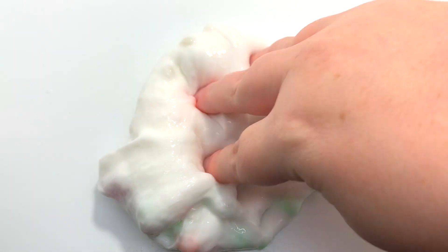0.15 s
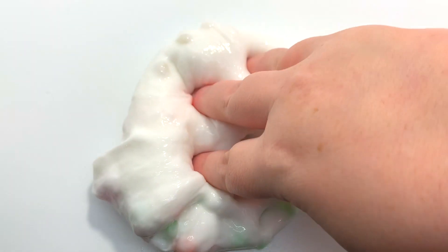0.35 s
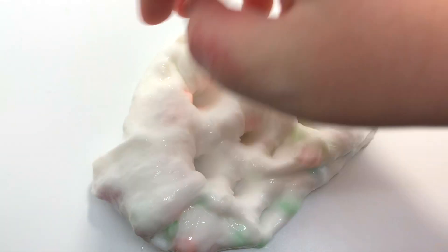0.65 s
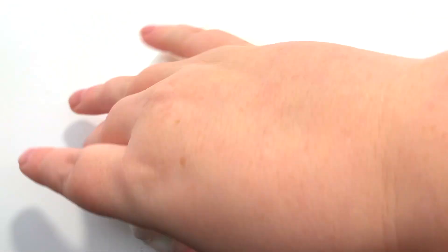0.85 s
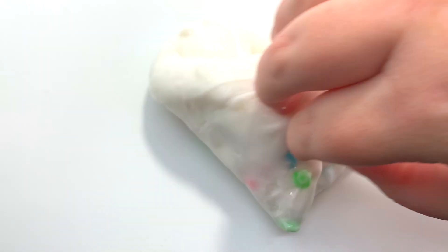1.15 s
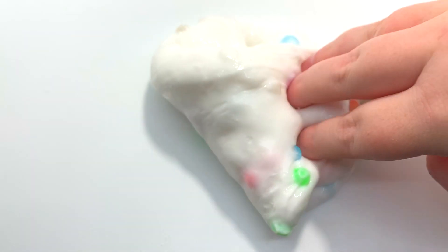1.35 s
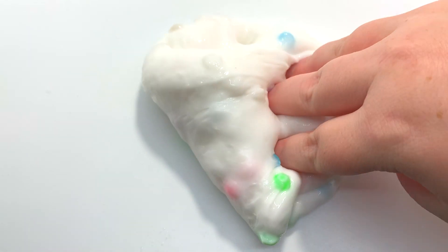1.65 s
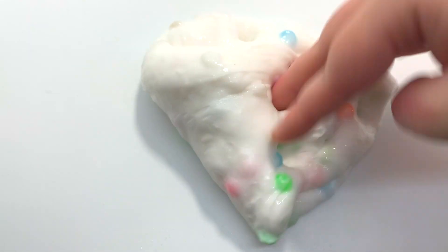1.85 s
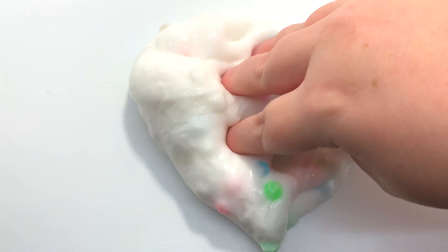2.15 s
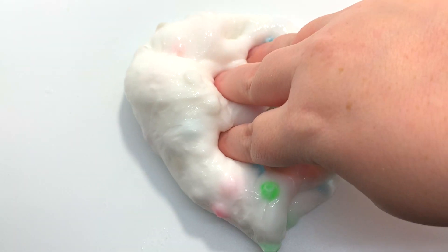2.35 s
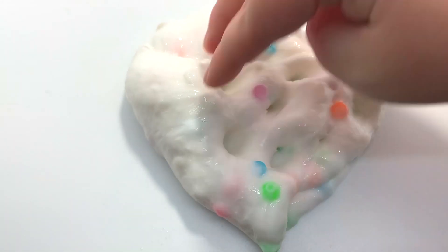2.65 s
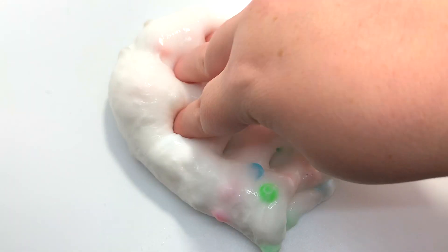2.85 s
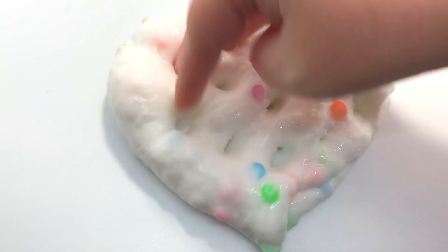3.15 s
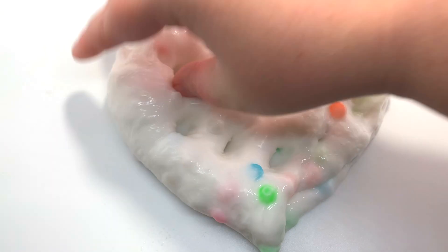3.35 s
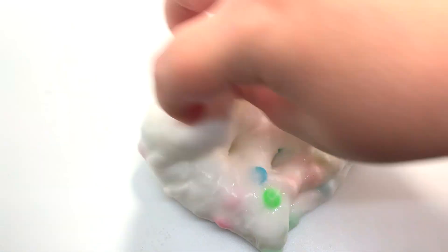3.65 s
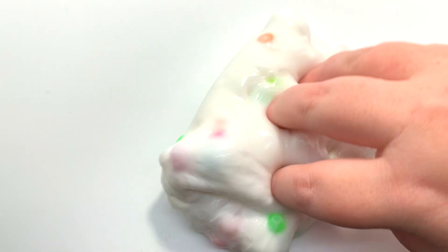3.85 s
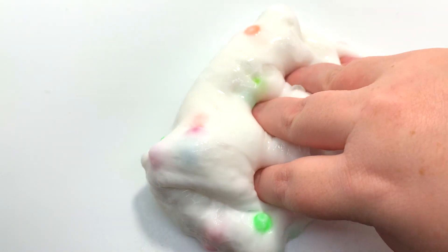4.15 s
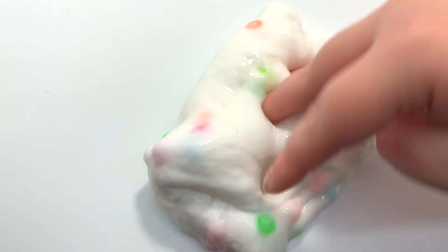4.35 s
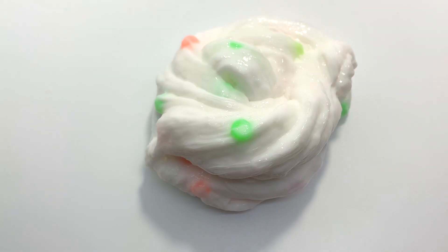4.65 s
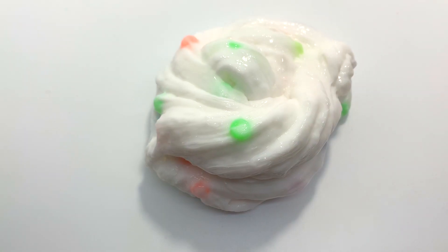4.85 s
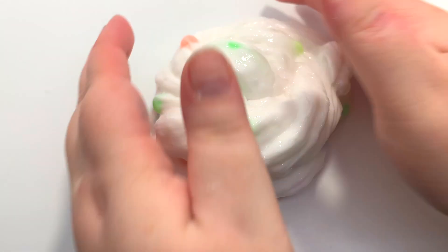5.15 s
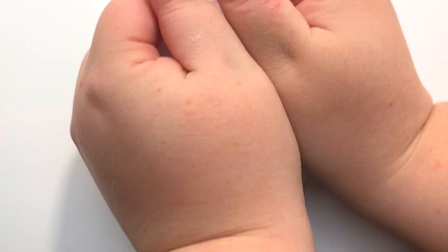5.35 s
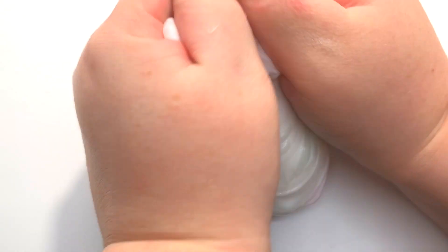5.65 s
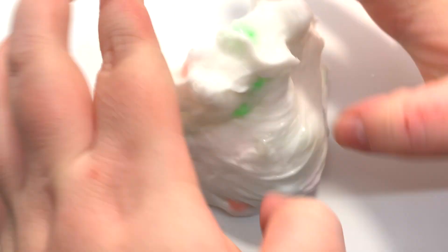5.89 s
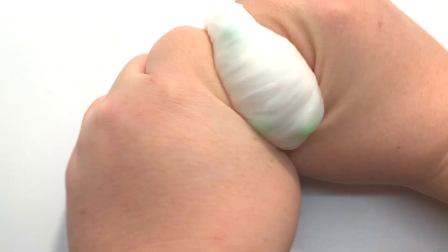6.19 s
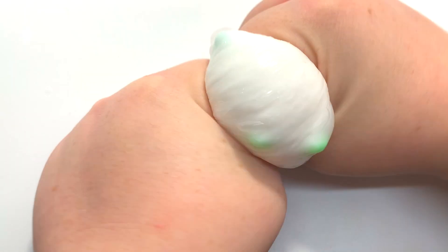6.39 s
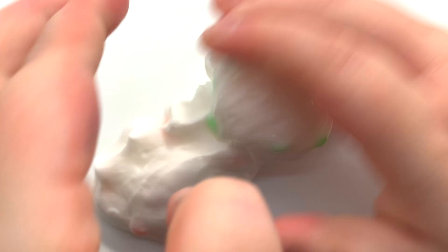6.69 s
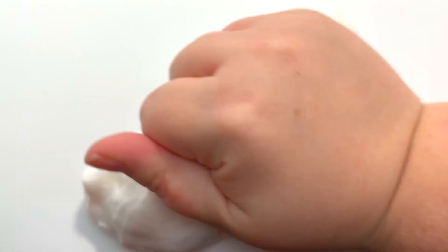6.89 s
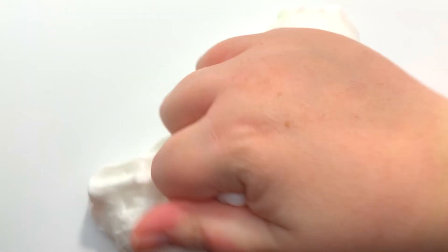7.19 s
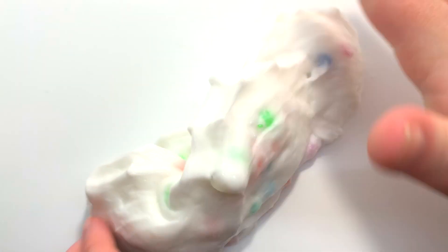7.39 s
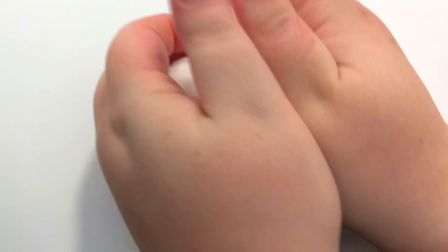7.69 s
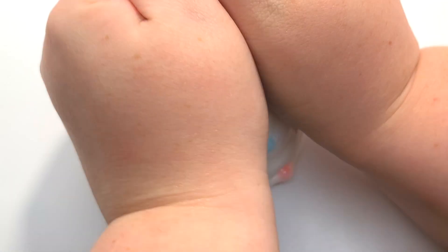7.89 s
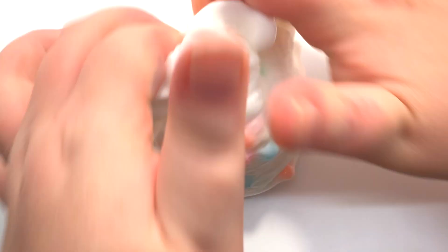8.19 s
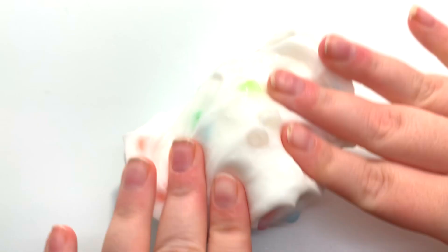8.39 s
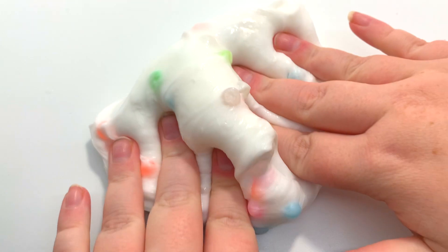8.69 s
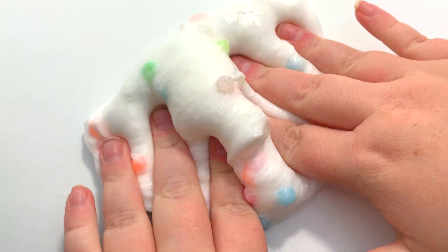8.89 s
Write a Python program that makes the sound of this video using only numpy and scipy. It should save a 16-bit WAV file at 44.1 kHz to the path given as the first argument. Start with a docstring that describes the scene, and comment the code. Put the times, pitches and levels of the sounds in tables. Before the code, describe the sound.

Very close to the microphone in a small quiet room, fingers poke thick slime on a table. Isolated hollow pops and clicks come with soft low bumps, ending in a quick cluster of pops. After a brief abrupt hush with only faint air noise and hum, hands squeeze and fold the slime hard, giving loud dense crackles, sharp snaps and wet squelches, then thinning out to near quiet.

```python
"""Slime kneaded on a table

Thick slime is poked, folded and squeezed on a table close to the microphone, in a small quiet room.
Air pockets burst: a decaying sine with a hollow gurgle, and a bright noise snap with a click.
Hand strokes swell grainy noise into squelch and peeling crackle, and low noise into table shake.
Feedback delays echo the bursts; steady air noise and an unsteady low hum lie behind.
"""
import sys
import numpy as np
from scipy import signal
from scipy.io import wavfile

SR = 44100
rng = np.random.default_rng(int(sys.argv[2]) if len(sys.argv) > 2 else 0)


def store_wav(level_fs):
    """Save 16-bit WAV to argv[1]."""
    pcm = np.round(np.clip(np.atleast_2d(level_fs), -1, 1) * 32767)
    wavfile.write(sys.argv[1], SR, pcm.T.astype(np.int16))


N = 398223


def from_db(db):
    """Amplitude gain of a level in dB."""
    return 10 ** (np.asarray(db) / 20)


def rms_one(x):
    """Scale to rms 1."""
    return x / np.sqrt(np.mean(x ** 2) + 1e-20)


def band(x, low_hz, high_hz):
    """Butterworth band-pass."""
    edges_hz = [low_hz, min(high_hz, .45 * SR)]
    return signal.sosfilt(signal.butter(2, edges_hz, "band", fs=SR, output="sos"), x)


def coloured(sources, spectrum):
    """Third-octave bands dealt from the sources in turn, weighted by the spectrum; rms 1."""
    hz, level_db = np.transpose(spectrum)
    edges = np.geomspace(hz[0], hz[-1], int(3 * np.log2(hz[-1] / hz[0])) + 1)
    log_centres = np.log(edges[1:] * edges[:-1]) / 2
    gains = from_db(np.interp(log_centres, np.log(hz), level_db))
    total = 0
    for k, gain in enumerate(gains):
        total = total + gain * band(sources[k % len(sources)], edges[k], edges[k + 1])
    return rms_one(total)


def room_tone():
    """Steady air noise and an unsteady low hum, the hum being narrow-band noise."""
    # air noise: f/Hz, relative density/dB per Hz
    air_spectrum = [(18, 2), (62, -1), (75, -24.5), (130, -17), (220, -29.5), (500, -38.5), (900, -35.5),
                    (2500, -48), (16500, -58)]
    air = from_db(-54) * coloured(rng.standard_normal((2, N)), air_spectrum)
    hum = from_db(-60) * rms_one(band(rng.standard_normal(N), 56.5, 61.1))
    return air + hum


def strokes():
    """Hand movements: peak s, rise ms, fall ms, hollow Hz, then squelch, crackle, thump, shake in dB."""
    # fingers poke down through the slime: peak/s, squelch/dB, table shake/dB
    poke_table = [(0.481, -50, -33.5), (1.838, -53, -36), (2.478, -52.5, -38), (3.099, -52, -31),
                  (4.365, -48.5, -31.5), (8.949, -43.5, -38)]
    # the hand or the lump bumps the table: peak/s, thump/dB, table shake/dB
    bump_table = [(0.791, -45.5, -40), (1.978, -50.5, -44), (2.662, -45.5, -34), (3.36, -42, -29.5),
                  (5.157, -62, -34), (6.688, -55, -37.5), (7.28, -63, -34.5)]
    # squeezes, folds, peels: peak/s, rise/ms and fall/ms over 20 dB, squelch/dB, crackle/dB, table shake/dB
    squeeze_table = [(0.03, 32.5, 171, -66, -70, -49), (0.862, 51.6, 260, -60.5, -58.5, -53),
                     (3.429, 41.7, 22, -48, -58, -38.5), (3.552, 89, 171, -55, -56.5, -44.5),
                     (3.787, 89, 268, -71.5, -74.5, -64.5), (5.05, 22.3, 160, -68, -65.5, -56),
                     (5.302, 148, 123, -49.5, -40, -48.5), (5.456, 29, 126, -41, -33, -52),
                     (5.699, 61.5, 84, -43.5, -42, -42), (5.798, 40, 75, -49, -57, -41),
                     (5.951, 44, 73.5, -64.5, -63, -45), (6.122, 111.5, 171, -39.5, -36, -45.5),
                     (6.43, 80, 93, -42.5, -42, -40), (6.528, 26.4, 42.5, -57, -54.5, -41.5),
                     (6.862, 136, 160, -48.5, -45, -51.5), (7.181, 78, 78, -46, -47, -40.5),
                     (7.35, 41.4, 43.6, -54.5, -65, -42.5), (7.426, 35.7, 72, -54.5, -57.5, -43),
                     (7.569, 97, 130, -57.5, -53, -60.5), (7.729, 56, 44.5, -57.5, -50, -44.5),
                     (7.88, 131, 144, -50, -44, -63), (8.072, 51.3, 69, -47.5, -43.5, -35.5),
                     (8.22, 134, 54.5, -45, -54, -46.5), (8.4, 282, 453, -75, -71.5, -61)]
    base_hollow_hz, db_per_octave = 1590, 14
    moves = []
    for s, wet_db, shake_db in poke_table:
        moves.append((s, 55, 99, 600, wet_db, wet_db - 7, shake_db - 3.5, shake_db))
    for s, thump_db, shake_db in bump_table:
        moves.append((s, 12.3, 37.4, 660, shake_db - 22, shake_db - 41.5, thump_db, shake_db))
    for s, rise_ms, fall_ms, wet_db, dry_db, shake_db in squeeze_table:
        # the wetter a squeeze (squelch above crackle), the deeper its hollow
        hollow_hz = base_hollow_hz * 2 ** (min(dry_db - wet_db, 0) / db_per_octave)
        moves.append((s, rise_ms, fall_ms, hollow_hz, wet_db, dry_db, shake_db - 12, shake_db))
    return moves


def grains(per_s, spread_db, smooth):
    """Envelope of films tearing at random in uneven short puffs, over a steady part."""
    puff_t60_s = 0.015
    sizes = from_db(spread_db * np.minimum(rng.exponential(1, N), 5))
    tears = sizes * (rng.random(N) < per_s / SR)
    return rms_one(signal.lfilter([1], [1, -from_db(-60 / (puff_t60_s * SR))], tears)) + smooth


def ticks(per_s, level):
    """Stray threads snapping: clicks of very uneven size, each dealt to one broad band."""
    sizes = from_db(5 * np.minimum(rng.exponential(1, N), 3)) * rng.choice([-1, 1], N)
    born = rng.random(N) < per_s / SR
    dealt = rng.integers(0, 8, N)
    snaps = np.zeros(N)
    for k, hz in enumerate(np.geomspace(1200, 9500, 8)):
        clicks = sizes * born * (dealt == k) + 1e-18
        snaps += band(clicks, hz / 1.3, hz * 1.3) / np.sqrt(hz)
    return level * rms_one(snaps)


def kneading():
    """Wet squelch, peeling crackle and the low shaking that the hands send through the table."""
    # squelch: f/Hz, relative density/dB per Hz
    squelch_spectrum = [(330, -10), (700, 0), (1700, -2), (3600, -11.5)]
    # crackle: f/Hz, relative density/dB per Hz
    crackle_spectrum = [(1470, -29), (2500, -6), (7260, -4.5), (15100, -22.5), (16500, -32)]
    t, power, wet = np.arange(N) / SR, np.zeros((3, N)), np.zeros(N)

    # some films tear across the whole range, others only in a few bands, so the colour keeps shifting
    broad = grains(90, spread_db=5.0, smooth=0.93)
    torn = []
    for _ in range(5):
        envelope = broad + grains(110, spread_db=6.5, smooth=.25)
        torn.append(envelope * rng.standard_normal(N))
    slush = coloured(torn[:3], squelch_spectrum)

    for peak_s, rise_ms, fall_ms, hollow_hz, squelch_db, *levels_db in strokes():
        # four rise times before the peak to four fall times after
        start = max(round((peak_s - rise_ms / 250) * SR), 0)
        span = slice(start, round((peak_s + fall_ms / 250) * SR))
        away = 1000 * np.abs(t[span] - peak_s) / np.where(t[span] < peak_s, rise_ms, fall_ms)
        swell = from_db(-20 * away ** 1.8)
        power[:, span] += (from_db(levels_db)[:, None] * swell) ** 2
        # the hollow between hand and slime resonates
        hollow = rms_one(band(slush[span], hollow_hz / 1.22, hollow_hz * 1.22))
        wet[span] += from_db(squelch_db) * swell * (1.023 * slush[span] + 0.32 * hollow)

    crackle, thump, shake = np.sqrt(power)
    peeling = crackle * coloured(torn[2:], crackle_spectrum)

    # threads go on snapping for a while after the hand has let go
    settle = np.exp(-1 / (.12 * SR))
    capped = np.minimum(crackle, from_db(-52.5))
    stray = ticks(48, from_db(-16) * signal.lfilter([1 - settle], [1, -settle], capped))

    gooey = grains(85, spread_db=2.5, smooth=0.8) * rng.standard_normal(N)
    thumping = thump * rms_one(band(gooey, 99, 300))
    shaking = shake * rms_one(band(rng.standard_normal(N), 9.2, 78))
    return wet + peeling + stray + thumping + shaking


def pops():
    """Each pocket rings a few cycles, sinking in pitch as it opens; the torn skin snaps and sprays noise."""
    # bursting air pockets: t/s, pocket f/Hz, pocket level/dB, snap level/dB
    pop_table = [(0.06, 1660, -67, -55), (0.183, 1690, -56, -49), (0.436, 1780, -13, -24),
                 (0.5008, 1120, -31.5, -41), (0.787, 1680, -42, -65), (0.807, 2500, -47, -72),
                 (0.844, 2090, -34, -53), (0.9626, 1460, -31.5, -43.5), (1.035, 1610, -41, -45),
                 (1.3095, 1750, -41.5, -37), (1.778, 1640, -21, -39), (1.7887, 1460, -8.5, -13),
                 (1.8127, 1155, -11, -25.5), (1.8487, 850, -25.5, -32), (2.078, 1500, -59, -51.5),
                 (2.4178, 1600, -12.5, -20), (2.4611, 1200, -3.5, -18.5), (3.062, 1690, -30.5, -51),
                 (3.0733, 1410, -24, -46), (3.088, 1410, -28, -38), (3.1114, 1176, -5.5, -10.5),
                 (3.1465, 600, -30, -26), (3.3531, 685, -33, -40.5), (3.5396, 1170, -29.5, -35),
                 (3.636, 1240, -44, -47), (3.784, 1330, -51, -46), (3.828, 1260, -52, -54.5),
                 (3.878, 1900, -55, -60.5), (4.007, 2170, -58, -73), (4.061, 2250, -55.5, -71),
                 (4.115, 2300, -55.5, -75), (4.2742, 2060, -14.5, -45.5), (4.2848, 1940, -28, -28),
                 (4.3011, 1220, -3.5, -16.5), (4.327, 1160, -7.5, -13), (4.3608, 1170, -9, -14),
                 (4.406, 990, -30.5, -58), (5.2032, 1610, -21.5, -27.5), (5.2642, 1710, -27, -52),
                 (5.3185, 660, -26.5, -15), (5.332, 1330, -22.5, -11.5), (5.3649, 780, -25, -14.5),
                 (5.3797, 1340, -19, -10), (5.392, 1400, -9, -1), (5.4058, 1390, -13, -7.5),
                 (5.4255, 1240, -11, 3.5), (5.4471, 1210, -10, -4), (5.453, 1310, -0.5, 5.5),
                 (5.4646, 1790, 2, 6), (5.4951, 1220, -38, -10.5), (5.527, 2620, -19, -25),
                 (5.6638, 2100, -32.5, -18), (5.9235, 1270, -40, -46), (5.9827, 780, -41, -55),
                 (6.036, 2500, -43, -33), (6.049, 1300, -21.5, -33), (6.0532, 1310, -16.5, -21),
                 (6.0831, 710, -28.5, -31.5), (6.0927, 1800, -17, -20), (6.1366, 1295, -5.5, -2),
                 (6.1652, 1300, -24.5, -19), (6.1775, 2500, -9, -13.5), (6.1913, 1340, -5.5, -2.5),
                 (6.2041, 1270, -15.5, -10.5), (6.2314, 2100, -13, -12.5), (6.2626, 2130, -29.5, -21.5),
                 (6.3932, 1200, -23.5, -27.5), (6.7282, 1670, -42, -35), (6.754, 2390, -20.5, -18.5),
                 (6.783, 2400, -45, -31), (6.818, 2400, -48, -33), (6.831, 2410, -35, -24),
                 (6.8466, 1090, -39.5, -26.5), (6.8761, 1320, -21, -33), (6.8875, 1270, -24, -12.5),
                 (6.9083, 1185, -9.5, -13.5), (6.943, 2420, -35.5, -26.5), (6.9636, 1660, -29.5, -27),
                 (6.9807, 2290, -20.5, -26), (7.009, 2400, -48, -38), (7.276, 1215, -42, -51),
                 (7.398, 2400, -50, -52.5), (7.5543, 1310, -41.5, -36.5), (7.6658, 2500, -38, -38),
                 (7.696, 1290, -34, -31.5), (7.71, 1270, -42.5, -30), (7.7734, 1120, -19.5, -15.5),
                 (7.7886, 1360, -32, -27.5), (7.8047, 1240, -24.5, -27), (7.823, 1600, -32.5, -31.5),
                 (7.8339, 756, -28.5, -16.5), (7.851, 1600, -31.5, -34), (7.8824, 1230, -30, -36),
                 (7.9115, 1240, -25, -29.5), (7.9163, 1215, -13, -13.5), (7.926, 1680, -13.5, 1),
                 (7.9691, 2040, -22, -14.5), (8.0499, 710, -30, -41.5), (8.3993, 1890, -39.5, -42),
                 (8.4494, 1120, -49, -43.5), (8.519, 1800, -49, -35), (8.5394, 1695, -31, -26.5),
                 (8.7846, 1560, -41.5, -61)]
    ring_cycles, sink, sink_s = 14, .15, 0.0012  # ring to -60 dB; pitch starts higher by the fraction sink
    gurgle_db, gurgle_t60_s = -12, 0.046  # against the pocket
    push_db, push_hz, push_cycles = -15, 500, 4.4  # low push of air, against the pocket; cycles to -60 dB
    snap_hz, snap_spread_octaves, snap_t60_s = 5970, .4, 0.057  # crest at random around snap_hz
    click_db = 13  # bare click as the skin tears, against the snap

    out, t = np.zeros(N + 8192), np.arange(8192) / SR
    noise = rng.standard_normal((len(pop_table), 2, len(t)))
    crests_hz = snap_hz * 2 ** (snap_spread_octaves * rng.uniform(-1, 1, len(pop_table)))
    push = np.sin(2 * np.pi * push_hz * t) * from_db(push_db - 60 * t * push_hz / push_cycles)
    click = from_db(click_db) * band(1. * (t == 0), 1500, 11000)
    snap_decay = from_db(-7.5 - 60 * t / snap_t60_s) + from_db(-1.0 - 60 * t / 0.0029)
    gurgle_decay = from_db(gurgle_db - 60 * t / gurgle_t60_s)

    for (s, pocket_hz, pocket_db, snap_db), crest_hz, (air, spray) in zip(pop_table, crests_hz, noise):
        phase = 2 * np.pi * pocket_hz * (t + sink * sink_s * (1 - np.exp(-t / sink_s)))
        ring_decay = from_db(-60 * t * pocket_hz / ring_cycles)
        ring = np.sin(phase) * ring_decay * (1 - np.exp(-t / 0.00021))
        gurgle = rms_one(band(air, .45 * pocket_hz, 1.53 * pocket_hz)) * gurgle_decay
        # the snap is broad, with a narrower crest at a random frequency
        crest = rms_one(band(spray, crest_hz / 1.15, crest_hz * 1.15))
        colour = rms_one(band(spray, 2600, 9800)) + 1.2 * crest
        snap = rms_one(colour) * snap_decay + click
        at = round(s * SR)
        out[at:at + len(t)] += from_db(pocket_db) * (ring + gurgle + push) + from_db(snap_db) * snap
    return out[:N]


def room(x):
    """Echo of eight feedback delays, duller on every round, stepped block by block."""
    t60_s, wall_cut_hz = 0.24, 26000  # wall_cut_hz sets the one-pole coefficient
    out, dull = np.zeros(N), np.exp(-2 * np.pi * wall_cut_hz / SR)
    for k, lag in enumerate((np.geomspace(.007, .023, 8) * SR).astype(int)):
        loop, gain, state = x + 1e-18, from_db(-60 * lag / SR / t60_s), [0.]
        for i in range(lag, N, lag):
            back, state = signal.lfilter([gain * (1 - dull)], [1, -dull], loop[i - lag:i], zi=state)
            loop[i:i + lag] += back[:N - i]
        out += (loop - x) * (-1) ** k  # echoes only, alternate signs
    return out


def crested(x):
    """The sound plus narrow two-pole resonances that colour the whole sound, room tone included."""
    # resonances: f/Hz, width/Hz, level/dB
    crest_table = [(500, 86, -1.5), (1068, 18, 0), (1340, 34, -6), (1640, 68, -2)]
    out = x
    for hz, width_hz, level_db in crest_table:
        r = np.exp(-np.pi * width_hz / SR)
        poles = [1, -2 * r * np.cos(2 * np.pi * hz / SR), r * r]
        out = out + from_db(level_db) * signal.lfilter([(1 - r * r) / 2, 0, (r * r - 1) / 2], poles, x)
    return out


def scene():
    """Slime, the echo of its bursts and the room tone."""
    hush_start_s, hush_end_s, echo_db = 4.4555, 5.03, -31
    bursts, t = pops(), np.arange(N) / SR
    slime = bursts + from_db(echo_db) * room(bursts) + kneading()
    # slime and echo break off abruptly; the room tone goes on
    sounding = (t < hush_start_s) | (t > hush_end_s)
    return crested(slime * sounding + room_tone())[None]


def record(dry):
    """Flatten loud peaks smoothly towards a ceiling, then cut the top."""
    ceiling, stop_hz = .5, 16400  # 70 dB down from stop_hz
    flat = dry / (1 + np.abs(dry / ceiling) ** 4) ** .25
    return signal.sosfilt(signal.cheby2(12, 70, stop_hz, fs=SR, output="sos"), flat)


dry = scene()
out = record(dry)
store_wav(out)
```